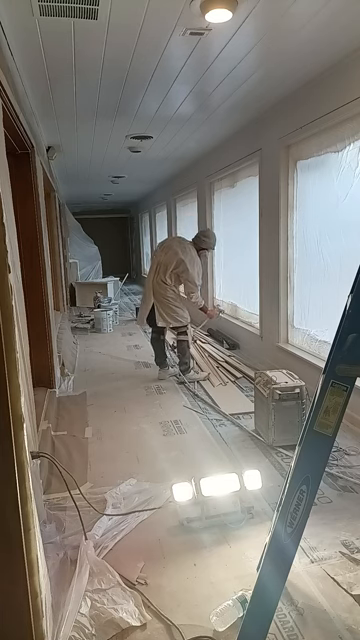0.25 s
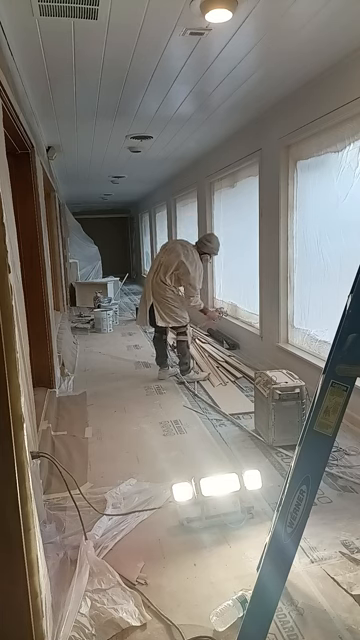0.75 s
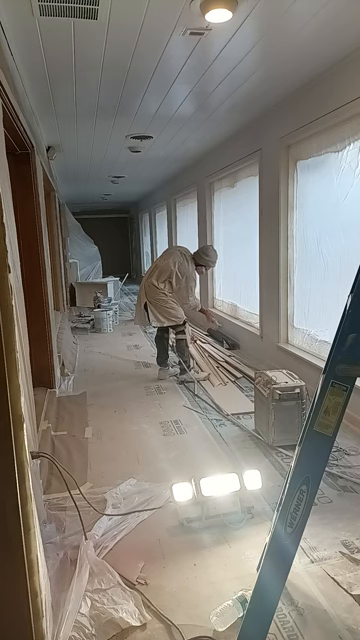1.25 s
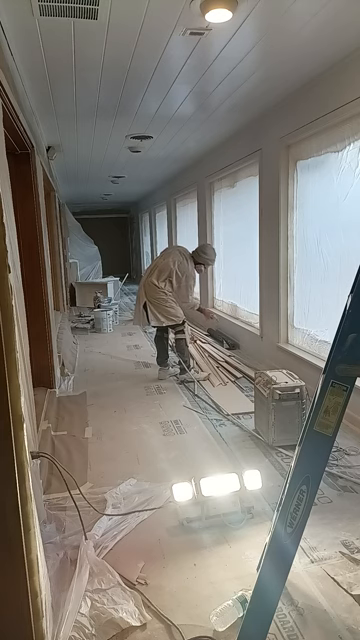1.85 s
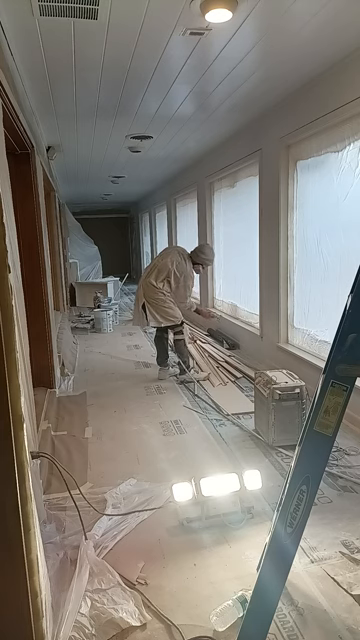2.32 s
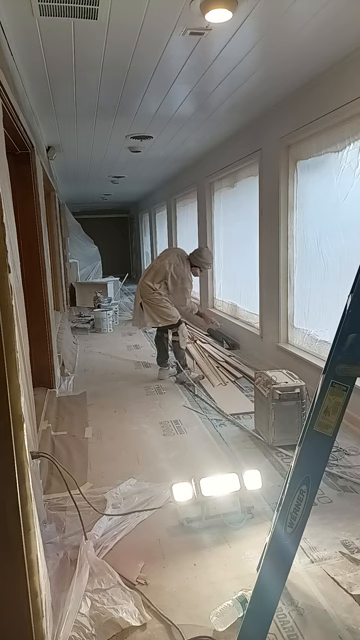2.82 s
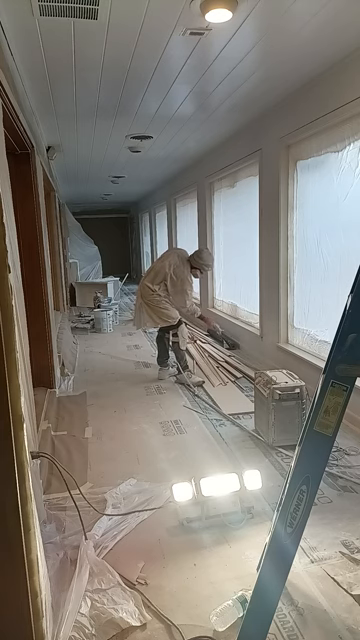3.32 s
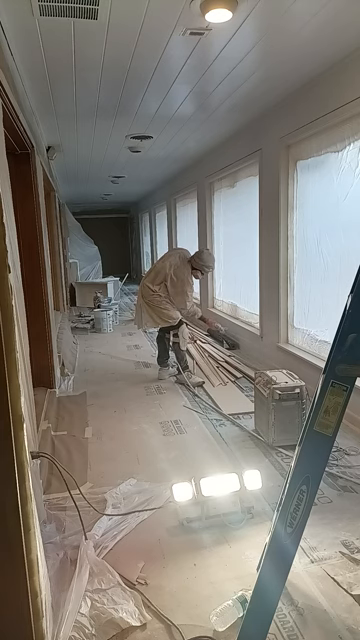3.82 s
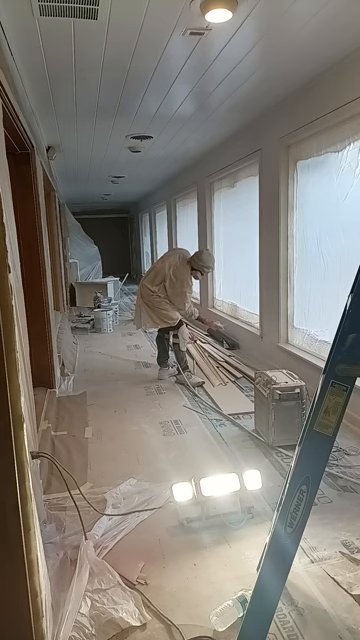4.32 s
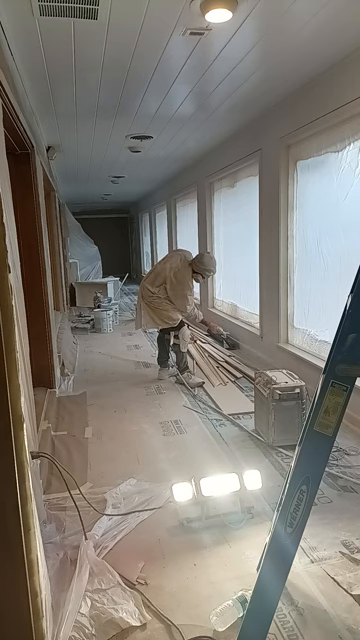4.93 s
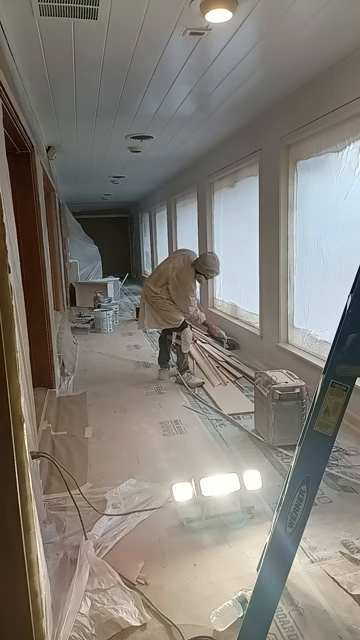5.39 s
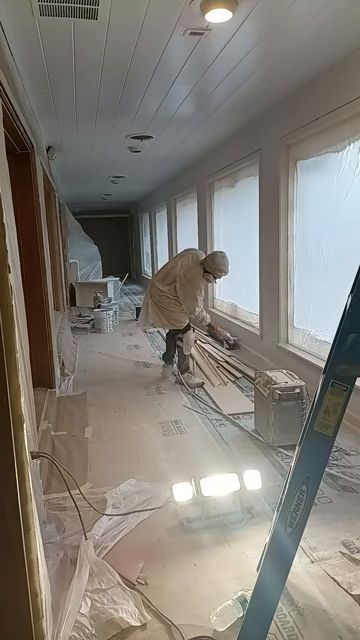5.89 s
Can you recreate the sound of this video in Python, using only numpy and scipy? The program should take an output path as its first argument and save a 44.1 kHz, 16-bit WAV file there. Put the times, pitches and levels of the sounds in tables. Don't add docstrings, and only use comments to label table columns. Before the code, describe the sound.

A long bare room with short, hard reflections and a low steady murmur, heard in uneven stereo a few steps from an airless paint sprayer. A bright, dense hiss with wet splash is already running and the pump motor whirs at speed; the trigger releases at 0.6 s and the spray tails off. The motor spins up again near 0.8 s. Short spits and tiny clinks at 1.2-1.45 s lead to a pass until 2.3 s. Further passes run about 2.6-3.3, 3.6-4.4 and 4.7-5.5 s, the second opening with the strongest spit. The motor whirs and rattles, gliding up then down, around 2.4, 3.5, 4.5 and 5.5 s. Sharp bright metal clinks stand out near 2.4, 3.5 and 5.5 s. Soft low floor thuds occur throughout. The last pass starts near 5.75 s and keeps spraying to the end.

```python
import sys
import numpy as np
from scipy import signal
from scipy.fft import rfft, irfft, next_fast_len
from scipy.io import wavfile
from scipy.ndimage import uniform_filter1d, map_coordinates

SR = 44100
rng = np.random.default_rng(int(sys.argv[2]) if len(sys.argv) > 2 else 0)


def rack_gain(trim_db):
    fader = np.asarray(trim_db, float)
    return 10 ** (fader / 20)


def master_out(mix):
    frames = np.transpose(np.atleast_2d(mix))
    ceiling = np.clip(frames, -1, 1)
    pcm = np.round(ceiling * 32767).astype(np.int16)
    wavfile.write(sys.argv[1], SR, pcm)


N = 271270

# top_speed_s, gear_tone_db, rattle_db, spin_up_stretch, coast_stretch [ratios]
STROKES = [
    (.04, -20.5, -21, 0.97, 1.092),
    (.7725, -21.5, -22, 1.009, .92),
    (2.4125, -21, -20.5, 1.007, 1.0896),
    (3.51, -21, -20, 1.072, 0.9),
    (4.5475, -20.5, -21, 0.979, 0.986),
    (5.535, -21.5, -21, 1.024, 1),
]


def unit(x):
    return x / np.sqrt(np.mean(x ** 2) + 1e-20)


def along(points, hz):
    f, v = np.transpose(points)
    return np.interp(np.log(hz + 1), np.log(f + 1), v)


def wobble(rate):
    knots = rng.standard_normal(int(N * rate / SR) + 4)
    return map_coordinates(knots, [np.arange(N) * rate / SR])


def filtered(x, response):
    m = next_fast_len(N + SR // 2)
    return irfft(rfft(x, m) * response(np.fft.rfftfreq(m, 1 / SR)), m)[..., :N]


def rush(spectrum, patchy_db, grain_db):
    grainy = rng.standard_normal((2, N)) * rack_gain(grain_db * wobble(400))
    z = signal.stft(np.float32(grainy), nperseg=512)[2]
    field = uniform_filter1d(rng.standard_normal(z.shape[1:]), size=5, axis=0)
    field = uniform_filter1d(field, size=8, axis=1)
    pair = signal.istft(z * np.float32(rack_gain(patchy_db * unit(field))), nperseg=512)[1][:, :N]
    return unit(filtered(pair, lambda hz: np.float32(rack_gain(along(spectrum, hz)))))


def bursts(times, levels_db, t60):
    steps, t = np.zeros(N + SR), np.arange(SR // 2) / SR
    for s, db, fade in np.broadcast(times, levels_db, t60):
        steps[round(s * SR):][:len(t)] += rack_gain(db - 60 * t / fade)
    return uniform_filter1d(steps[:N], size=40)


def swells(start, stop, db, rise_s, fall_s, rise_power, fall_power, sag_db=0):
    t = np.arange(0, N / SR + .002, .001)[:, None]
    before, after = np.maximum(start - t, 0), np.maximum(t - stop, 0)
    held = np.clip(t, start, stop) - start
    lost = 40 * ((before / rise_s) ** rise_power + (after / fall_s) ** fall_power)
    gain = rack_gain(db - lost - sag_db * held).sum(axis=1)
    return np.interp(np.arange(N) / SR, t[:, 0], gain)


def stroke(lag_s, level_db, rise_s, fall_s, fall_power):
    top, _, db, spin_up, coast = np.transpose(STROKES)
    peak = top + lag_s
    return swells(peak, peak, db + level_db, rise_s * spin_up, fall_s * coast, 2.48, fall_power)


def gun():
    # pull_s, let_go_s, jet_db, splash_db, dribble_stretch [ratio]
    passes = [
        (-.1, .6, -59, -50.5, 0.98),
        (1.24, 1.25, -74, -65, 0.334),
        (1.361, 1.42, -76.5, -58, 0.76),
        (1.48, 2.291, -59.5, -51.5, 0.73),
        (2.622, 3.31, -58.5, -50.5, 0.902),
        (3.642, 4.42, -59, -55, 0.91),
        (4.663, 5.48, -58.5, -51, 0.55),
        (5.765, 6.3, -59.5, -52.5, 1),
    ]
    # fall_s [over 40 dB], curve_power
    dribble = [
        (.5, .7),
        (0.68, 1.1),
        (0.54, 0.83),
    ]
    # start_s, peak_db, t60_s
    spits = [
        (1.2384, -40, 0.244),
        (1.3635, -27.5, 0.102),
        (1.3874, -35, 0.132),
        (1.422, -29.5, 0.265),
        (1.44, -30, 0.35),
        (2.615, -25, 0.17),
        (3.6424, -43, 0.2095),
        (5.7568, -47, 0.32),
    ]
    # peak_s, level_db
    edges = [
        (.25, -50),
        (.64, -58),
        (1.75, -57),
        (2.2, -56),
        (2.84, -48.5),
        (3.28, -59),
        (4.25, -54.5),
        (5.26, -55),
        (6.0, -53),
    ]
    # pitch_hz, level_db [per Hz]
    air_hz = [(5000, -37.5), (7800, -23.5), (8800, -34.5), (10000, 6), (11500, 2.5), (13500, -1),
              (15800, -4)]
    nozzle_hz = [(3100, -52), (5300, -35.5), (5700, -11.5), (6100, -6), (6500, -5.5), (7100, -1.5),
                 (7600, -3.5), (8200, -10), (9500, -17), (12000, -67.5)]
    splash_hz = [(710, -68.5), (1200, -46), (1900, -25.5), (1960, -17.5), (2580, -15), (4620, -5.5),
                 (5080, 0.5), (5600, -2), (7280, -36), (12300, -120)]
    spatter_hz = [(2500, -39.5), (4000, -6.5), (4800, 4), (5600, -1), (7000, 2), (8800, -11.5),
                  (10000, -20.5), (15700, -48)]
    pull, let_go, jet_db, splash_db, stretch = np.transpose(passes)
    levels = [(jet_db, .6), (jet_db + 14.5, 1.2), (splash_db, 16.5)]
    leaks_db = (-82.5, -67, -72.5)
    open_s = .02
    flow = []
    for (db, sag), (fall, power), leak in zip(levels, dribble, leaks_db):
        flow.append(rack_gain(leak) + swells(pull, let_go, db, open_s, fall * stretch, 1, power, sag))
    flutter, sweep = wobble(6.275), wobble(2.37)
    sparks = stroke(0.3, -54, 0.02, 0.27, 1)
    air = (flow[0] + sparks) * rush(air_hz, patchy_db=1, grain_db=1.2)
    nozzle = flow[1] * rack_gain(0.29 * flutter + .3 * sweep) * rush(nozzle_hz, patchy_db=1.65, grain_db=1.5)
    edge_s, edge_db = np.transpose(edges)
    landing = flow[2] + swells(edge_s, edge_s, edge_db, .34, .34, 2, 2)
    splash = landing * rack_gain(1.3 * flutter) * rush(splash_hz, patchy_db=3, grain_db=2.5)
    s, db, t60 = np.transpose(spits)
    spit = bursts(s, db - 19.5, t60) + bursts(s, db - 7.0, 0.0121)
    return rack_gain(2.5) * (air + nozzle + splash) + spit * rush(spatter_hz, patchy_db=3.0, grain_db=1.5)


def housing(f, flat):
    # pitch_hz, width_hz, level_db
    modes = [(545, 30, -12), (625, 25, -6), (694, 30, -1), (720, 16, 2), (810, 18, -2), (845, 16, 0),
             (905, 22, -4), (1405, 14, -5), (1486, 16, -5), (1537, 16, -3), (1580, 13, 3), (1675, 18, 2),
             (1730, 18, -4), (1831, 35, -4), (1960, 18, -5), (2297, 18, -5), (2415, 18, -2)]
    return flat + sum(rack_gain(db) * 1j * f * w / (c * c - f * f + 1j * f * w) for c, w, db in modes)


def pump():
    # pitch_hz, level_db [per Hz]
    gears_hz = [(560, -40.5), (900, -7), (1000, -6.5), (1150, -3.5), (1400, -3), (1630, -3.5), (1950, -4),
                (2150, -10.5), (2350, -5), (2640, -10.5), (3000, -9), (3400, -17), (7000, -120)]
    panels_hz = [(280, -39), (480, -7.5), (544, -3), (706, -5.5), (767, -7.5), (827, -5.5), (1050, -13.5),
                 (1360, -40), (2310, -120)]
    cart_hz = [(65, -56.5), (110, -19.5), (140, -37), (172, -19), (284, -4.5), (420, 2), (457, -2.5),
               (520, -5), (680, -9.5), (1140, -120)]
    whine_hz = [(1600, -39), (2700, -8.5), (3200, -5.5), (3970, -4), (4670, -1), (5200, 1.5), (5740, -5.5),
                (6300, -3), (6920, -4), (7530, -13.5), (8770, -25.5), (10500, -33), (15700, -84)]
    jerk_hz = [(150, -25), (300, 0), (700, -6), (2000, -11.5), (3000, -35)]
    # start_s, level_db
    starts = [
        (2.066, -51.5),
        (3.172, -45.5),
        (4.2, -52.5),
        (5.199, -51.5),
    ]
    run_on = stroke(0.0335, -35, 0.22, 2.5, 0.9486)
    throb = wobble(45)
    grind = rack_gain(0.73 * throb) * rush(gears_hz, patchy_db=2.0, grain_db=1)
    teeth = filtered(grind, lambda hz: 1 / (1 + (2500 / (hz + 1)) ** 6))
    gear_run = stroke(-0.0105, 0.26, 0.2152, 0.4457, 1.641) + run_on
    teeth_run = stroke(-0.0104, .6, 0.1836, 0.369, 1.52) + run_on
    gears = gear_run * (grind - teeth) + teeth_run * teeth
    strain = stroke(-0.069, -8, 0.1896, 0.1709, 1.5)
    panel_run = strain + stroke(0.03925, 0.497, .13, 0.3998, 1.418) + 1.087 * run_on
    panels = panel_run * rack_gain(0.69 * throb) * rush(panels_hz, patchy_db=3.0, grain_db=0.76)
    cart_run = stroke(0.0416, -6.5, 0.3758, 0.4308, 2) + .9 * run_on
    cart = cart_run * rack_gain(0.6 * throb) * rush(cart_hz, patchy_db=1.5, grain_db=1.2)
    whine_run = stroke(-0.0096, -3, 0.1468, 0.34, 1.2189)
    whine = whine_run * rack_gain(1.124 * throb) * rush(whine_hz, patchy_db=2, grain_db=1.0)
    jerk = bursts(*np.transpose(starts), .5) * rush(jerk_hz, patchy_db=3, grain_db=1.2)
    rattle = filtered(rack_gain(-2.5) * (gears + panels), lambda f: housing(f, flat=.9))
    return rattle + rack_gain(-1.0) * (cart + whine) + jerk


def mesh():
    # time_s, pinion_hz, drive_load_db, winding_hum_db
    spin = [
        (-.34, 60, -46.5, -49),
        (-.2, 230, -23.5, -22.5),
        (-.09, 540, -10, 1),
        (-.055, 753, -2, -15),
        (0, 841.2, -3, -10.5),
        (0.036, 793, -14.5, -2.5),
        (0.069, 680.3, -7.5, -18),
        (0.161, 485, -11.5, -43.5),
        (.35, 200, -29, -62.5),
    ]
    # pinion_multiple, level_db
    orders = [(1, -7), (2, 0), (3, -8), (4, -8), (6, -14)]
    # pitch_hz, level_db
    hums = [(288, -2.5), (716, -0.5), (1478, -7)]
    s, hz, load_db, hum_db = np.transpose(spin)
    t, out = np.arange(-SR // 3, SR // 3) / SR, np.zeros((2, N + SR))
    unsteady = wobble(40)
    for top, db, *_ in STROKES:
        at = round(top * SR) + SR // 6
        drift = 1 + .01 * np.roll(unsteady, -at)[:len(t)]
        turns = 2 * np.pi * np.cumsum(np.interp(t, s, hz) * drift) / SR
        clock = 2 * np.pi * np.cumsum(0.6 + 0.4 * drift) / SR
        tone = sum(rack_gain(level) * np.sin(k * turns + rng.uniform(0, 2 * np.pi, (2, 1))) for k, level in orders)
        hum = sum(rack_gain(level) * np.sin(f * clock + rng.uniform(0, 2 * np.pi, (2, 1))) for f, level in hums)
        out[:, at:at + len(t)] += rack_gain(db + np.interp(t, s, load_db)) * tone
        out[:, at:at + len(t)] += rack_gain(db - 3 + np.interp(t, s, hum_db)) * hum
    rough = rack_gain(2.5 * np.array([wobble(60), wobble(60)]))
    return filtered(rough * out[:, SR // 2:][:, :N], lambda f: housing(f, flat=.45))


def clicks():
    # start_s, peak_db, ring_hz, t60_s
    clinks = [(1.356, -40.5, 2145, 0.0198), (1.363, -40, 1810, .012), (1.441, -32, 2206, .014),
              (1.452, -35, 2482, .025), (1.462, -36.5, 2956, .025), (1.472, -38, 2690, 0.027),
              (5.88, -44, 4007, 0.51), (6.0, -45, 4000, 0.49), (2.07, -50, 1402, 0.11),
              (2.385, -28, 4826, .05), (2.788, -28, 1904, 0.0307), (2.949, -35.5, 2268, 0.033),
              (2.991, -43, 2359, 0.034), (3.174, -46, 1912, 0.102), (3.486, -22, 4830, 0.039),
              (5.192, -42, 1483, .1), (5.208, -38, 1482, .09), (5.791, -29, 1089, .1),
              (5.51, -19.5, 4848, 0.068)]
    out, t = np.zeros(N + SR), np.arange(SR // 5) / SR
    for s, db, hz, t60 in clinks:
        ring = np.sin(2 * np.pi * hz * t + 0.08 * np.cumsum(rng.standard_normal(len(t))))
        out[round(s * SR):][:len(t)] += rack_gain(db - 60 * t / t60) * (1 - np.exp(-t / .0012)) * ring
    return np.array([out[:N], 0.7 * np.roll(out[:N], 40)])


def boards():
    # peak_s, boom_db, thud_db
    steps = [(.01, -42, -58.5), (.3, -60.5, -75), (.76, -45.5, -58), (1.04, -69, -59.5), (1.5, -56, -58.5),
             (1.73, -71, -65.5), (2.2, -59.5, -70.5), (2.4, -45.5, -60.5), (2.87, -48, -67.5),
             (3.13, -67, -56.5), (3.52, -50.5, -56), (4.28, -66, -58), (4.46, -48.5, -52.5),
             (4.56, -46, -56), (4.8, -58, -68.5), (5.16, -55, -68), (5.27, -48.5, -61),
             (5.47, -50.5, -59.5), (6.05, -59.5, -66)]
    # pitch_hz, level_db [per Hz]
    joists_hz = [(110, -46.5), (145, -5), (160, 11), (178, -2), (230, -32)]
    thud_hz = [(35, -40.5), (60, -2.5), (95, 1), (125, -1), (200, -40)]
    swell_s, settle_s, still_db = 0.18, 0.389, -74.5
    s, boom_db, thud_db = np.transpose(steps)
    boom = rack_gain(still_db) + swells(s, s, boom_db - 6, swell_s, settle_s, 1.285, 1.1)
    thud = rack_gain(still_db) + swells(s, s, thud_db - 2.5, swell_s, settle_s, 1.285, 1.1)
    boom = boom * rush(joists_hz, patchy_db=3.0, grain_db=1.45)
    return boom + thud * rush(thud_hz, patchy_db=0.23, grain_db=1.56)


def room(x, wet_db):
    # pitch_hz, t60_s
    decay = [(200, 0.2575), (2000, 0.441), (7000, 0.27), (12000, 0.361)]
    hz, t, z = signal.stft(rng.standard_normal((2, SR // 2)), SR, nperseg=256)
    tail = signal.istft(z * rack_gain(-60 * t / along(decay, hz)[:, None]), SR, nperseg=256)[1]
    tail = np.pad(tail / np.linalg.norm(tail[0]), ((0, 0), (250, 0)))
    return x + signal.fftconvolve(x, rack_gain(wet_db) * tail, axes=1)[:, :N]


def still_air():
    # pitch_hz, level_db [per Hz]
    ambient_hz = [(15, -52), (30, -36), (60, -18.5), (100, -5.5), (160, -11.5), (260, -6), (600, -18.5),
                  (1000, -15), (2500, -19), (4300, -20.5), (7000, -11), (8800, -40), (10500, -52.5),
                  (15700, -60)]
    return rack_gain(-62) * rush(ambient_hz, patchy_db=1.5, grain_db=.6)


def scene():
    work = gun() + pump() + mesh() + clicks()
    return rack_gain(-2.5) * room(work, wet_db=-4) + still_air() + boards()


def top_cut(x):
    return signal.sosfilt(signal.butter(12, 15800, fs=SR, output="sos"), x)


def record(dry):
    # pitch_hz, likeness [0-1]
    alike = [(40, .8), (90, .93), (170, .97), (450, .93), (600, .3), (1000, .55), (1400, .3), (4000, .2),
             (15000, .2)]
    # pitch_hz, lag_rad
    lag = [(40, .1), (90, .55), (170, .8), (260, 1.4), (350, 1.75), (500, 2.7), (900, 1.6), (4000, 0),
           (8000, .3), (12000, -2.8)]
    # pitch_hz, level_db
    louder = [(40, 8), (90, 8), (300, 5.5), (520, -1.5), (1000, 6.5), (1600, 8.6), (5500, 6.5), (6900, 11),
              (8500, 2), (11000, -2), (15500, -9)]
    turn = lambda hz: np.arccos(np.clip(along(alike, hz), -1, 1)) / 2
    mid, side = filtered(dry, lambda hz: np.array([np.cos(turn(hz)), np.sin(turn(hz))]))
    port = lambda hz: rack_gain(along(louder, hz) / 2) * np.exp(-.5j * along(lag, hz))
    low_cut = lambda hz: (1j * hz / (45 + 1j * hz)) ** 2
    ports = lambda hz: np.array([port(hz), 1 / port(hz)]) * low_cut(hz)
    x = rack_gain(2.5) * filtered(np.array([mid + side, mid - side]), ports)
    x = x / (1 + np.abs(x / .98) ** 12) ** (1 / 12)
    return top_cut(x)


dry = scene()
out = record(dry)
master_out(out)
```